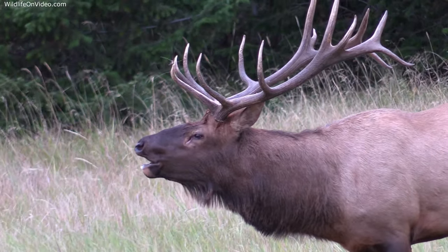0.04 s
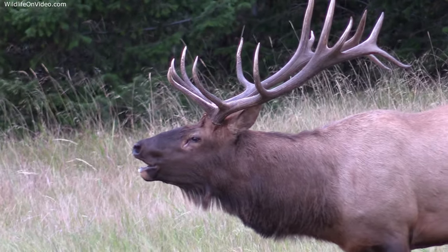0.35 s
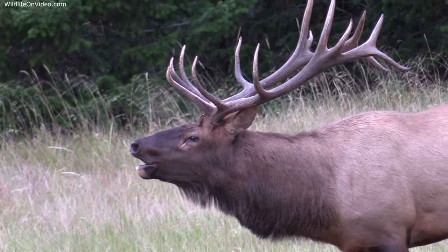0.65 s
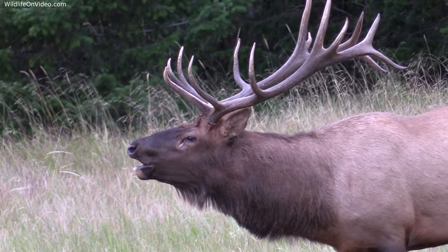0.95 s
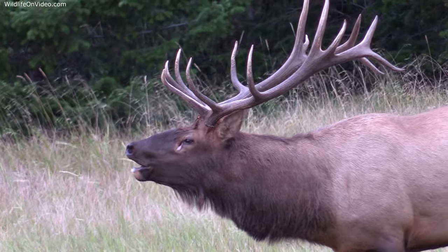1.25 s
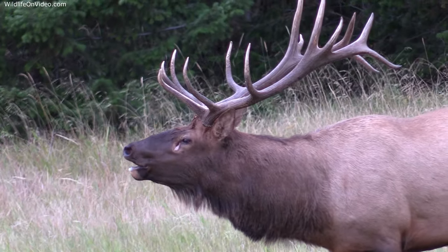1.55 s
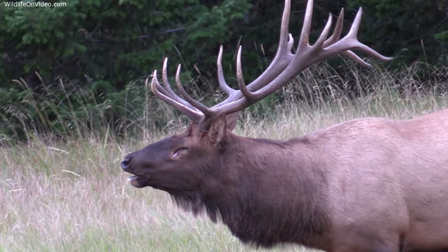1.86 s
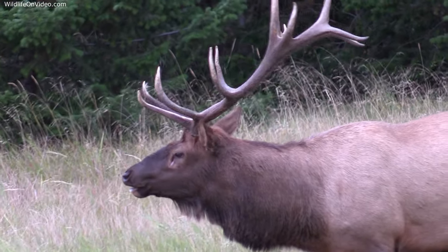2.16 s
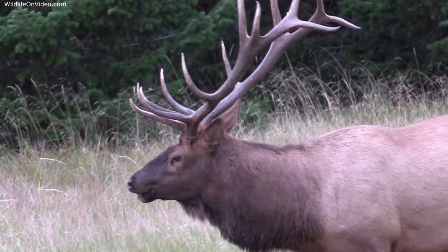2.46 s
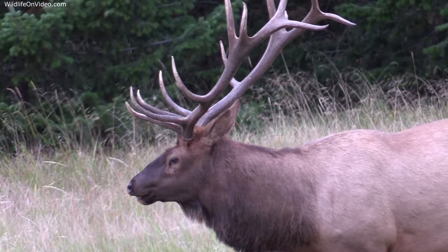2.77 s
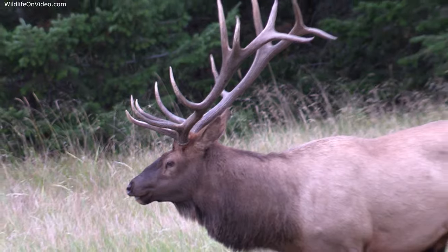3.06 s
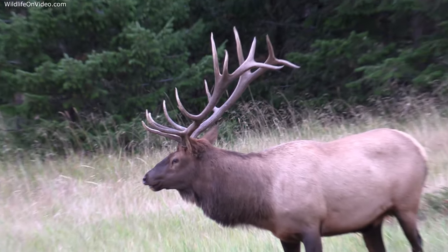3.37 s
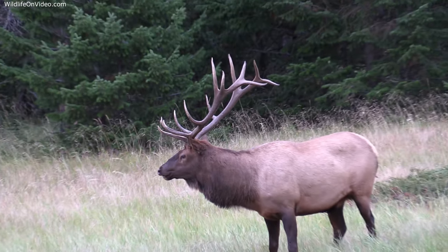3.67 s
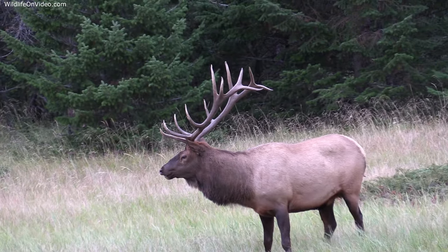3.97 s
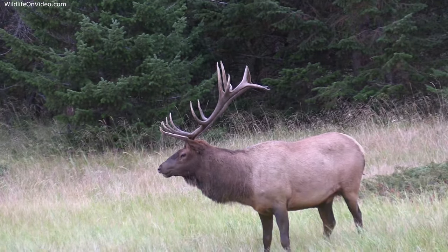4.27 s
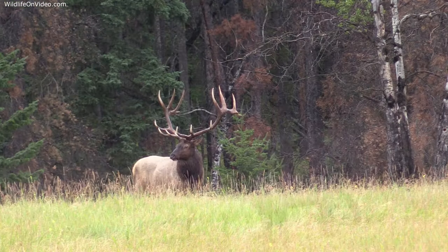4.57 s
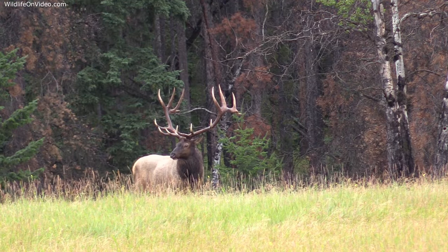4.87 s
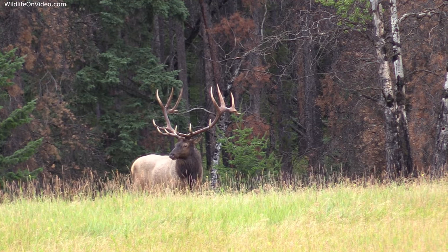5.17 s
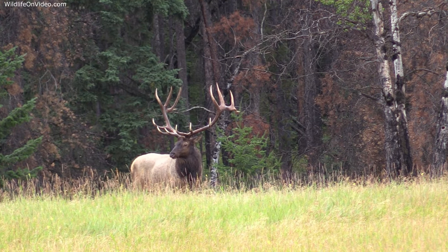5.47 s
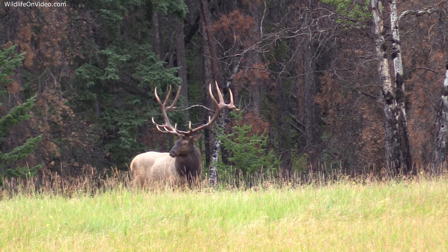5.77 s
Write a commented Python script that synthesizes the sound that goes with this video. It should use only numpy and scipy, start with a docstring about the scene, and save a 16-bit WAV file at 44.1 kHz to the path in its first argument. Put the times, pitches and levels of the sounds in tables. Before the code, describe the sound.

Outdoors at a forest edge, a fairly close bull elk chuckles, alternating honking breaths in with short, falling yelps. Thin whistles lead into the first two, and the fourth is a lower grunt. A faint echo dies away among the trees, leaving only the soft hush of the meadow. Toward the end, that hush blends into a louder, steady rush of faraway traffic.

```python
"""An elk chuckles by a forest

A bull elk calls in a meadow. Each push of air is a yelp that plunges through the resonances of his
long throat, the first two led in by a thin whistle. Before each yelp he sucks in air with a honk.
The trees echo faintly. Then the quiet meadow fades into a louder, duller rush of distant traffic."""
import sys
import numpy as np
from scipy import signal
from scipy.fft import rfft, irfft
from scipy.io import wavfile

SR = 44100
rng = np.random.default_rng(int(sys.argv[2]) if len(sys.argv) > 2 else 0)


def put_to_file(sound):
    """Save the sound as 16-bit audio at rate SR, in the file named by the first command-line argument."""
    columns = np.atleast_2d(sound).T  # one column per channel
    safe = np.clip(columns, -1, 1)
    whole_steps = np.round(safe * 32767)
    wavfile.write(sys.argv[1], SR, whole_steps.astype(np.int16))


N = 256662
TIME = np.arange(N) / SR

# The quiet air of the meadow: frequency_hz, level_db
MEADOW_SPECTRUM = [(15, -44), (25, -17.5), (144, -2.5), (178, -5.5), (281, -6), (305, -6.5), (331, -6),
                   (433, -6), (648, -6.5), (702, -7), (871, -10), (1950, -17.5), (3080, -24.5),
                   (8340, -32.5), (15500, -42.5)]
# How the meadow's low rumble rises and falls: time_s, level_db
MEADOW_RUMBLE = [(0, -3.5), (.7, -6), (1.3, 0), (2.5, 0.5), (4.3, -0.5)]
# Breaths in, each a moan that flips to a honk:
# flip_s, moan_length_s, first_pitch_hz, last_pitch_hz, honk_pitch_hz, moan_db, honk_db, air_db
PULLS = [(.007, 0.16, 403, 537, 1067, -19, -39, -29.5), (0.481, 0.13, 390, 555, 1045, -23.5, -26, -31),
         (1.003, .17, 363.6, 533.8, 673, -29, -24.5, -33.5), (1.471, 0.18, 320, 333.8, 145, -40, -20, -40)]
# Air rushing in: frequency_hz, level_db
IN_AIR_SPECTRUM = [(60, -23), (200, -15), (310, 1.5), (600, 12.5), (1000, 11.5), (1500, -5), (2300, -11.5),
                   (3500, -16.5), (7000, -25), (15000, -33)]
# Pitches at which the throat rings: frequency_hz, width_hz, level_db
THROAT_RESONANCES = [(168, 79, -8.5), (330.4, 87, 3.5), (420, 130, -6), (533.7, 42, 3), (679.7, 43, -3),
                     (858, 44, -2.5), (980, 76, -0.5), (1077, 151, 0), (1352, 107, -3), (1588, 43, 3),
                     (1865, 40, 5), (2100, 31, 4), (2310, 260, -0.5), (2880, 150, 1.5), (3870, 280, -6.5),
                     (4820, 99, -1.5), (5500, 500, -10)]
# Pitches that the nose and other side cavities swallow: frequency_hz, width_hz
CAVITY_NOTCHES = [(222, 91), (490, 12), (1180, 150), (1510, 45), (1700, 61), (1990, 170), (2960, 160)]
# Whistles: start_s, length_s, swell_db, swell_width_s, shrill_db
WHISTLES = [(0.101, 0.12, -27, 0.019, -30), (0.577, 0.11, -43.5, 0.035, -28.5)]
# The whistle's overtones, at 2 to 5 times its pitch: level_db
OVERTONES_DB = [0, -4.5, -22, -33]
# Breaths out: start_s, plunge_s, top_pitch_hz, bottom_pitch_hz, peak_after_s, width_s, tone_db, air_db
YELPS = [(.2, 0.037, 2154, 345.6, 0.041, 0.03, -11.5, -27), (.675, .04, 1983, 327.3, 0.03, 0.041, -13, -26),
         (1.113, .034, 1208, 238, 0.029, 0.019, -14, -40), (1.58, 0.03, 832.4, 273, 0.016, .014, -11, -47)]
# Air rushing out: frequency_hz, level_db
OUT_AIR_SPECTRUM = [(60, -16), (160, 7), (250, -2), (600, 5), (1200, 5), (2300, -11), (3200, -15),
                    (6000, -10.5), (9000, -27), (15000, -59)]
# Distant traffic: frequency_hz, level_db
TRAFFIC_SPECTRUM = [(18, -44), (30, -15), (75, -3), (152, 0.5), (182, -6), (263, -5), (420, -7.5),
                    (767, -0.5), (1230, -7.5), (1820, -11.5), (2910, -21.5), (4780, -26), (6530, -33.5),
                    (8490, -43), (15500, -49.5)]


def undb(db):
    """Turn decibels into a number to multiply by."""
    return 10 ** (np.asarray(db) / 20)


def unit(x):
    """Scale a signal to an average strength (rms) of 1."""
    return x / np.sqrt(np.mean(x ** 2))


def bump(t, width):
    """A smooth hill that reaches 1 at t = 0."""
    return np.exp(-(t / width) ** 2)


def gate(t, attack_s, length_s, release_s):
    """Rise from t = 0, hold until length_s, then die away."""
    return np.clip(t / attack_s, 0, 1) * np.exp(-np.maximum(t - length_s, 0) / release_s)


def colour(x, spectrum):
    """Shape the bass and treble along (frequency_hz, level_db) points."""
    hz, db = np.transpose(spectrum)
    bins = np.maximum(np.fft.rfftfreq(N, 1 / SR), 1)
    return irfft(rfft(x) * undb(np.interp(np.log(bins), np.log(hz), db)), N)


def wander(rate_hz):
    """A smooth random wobble of strength 1 that changes about rate_hz times a second."""
    bins = np.fft.rfftfreq(N, 1 / SR)
    return unit(irfft(rfft(rng.standard_normal(N)) * np.exp(-(bins / rate_hz) ** 2), N))


def far_noise(spectrum, flicker_db, bass_db, treble_db=0):
    """A steady, faraway rush in bands an octave wide; the low bands flicker most."""
    noise = rfft(unit(colour(rng.standard_normal(N), spectrum)))
    octave = np.log2(np.clip(np.fft.rfftfreq(N, 1 / SR), 32, 16384))
    out = 0
    for k in range(5, 15):
        band = irfft(noise * np.maximum(1 - abs(octave - k), 0), N)
        lowness = min(1, 2 ** (8 - k))
        highness = min(1, 2 ** (k - 12))
        flicker = flicker_db * wander(9.7) * np.sqrt(lowness)
        out = out + band * undb(flicker + bass_db * lowness + treble_db * highness)
    return out


def meadow(settle_db_per_s=0.38):
    """Quiet open air over a low rumble, slowly getting softer."""
    rumble_db = np.interp(TIME, *np.transpose(MEADOW_RUMBLE))
    air = far_noise(MEADOW_SPECTRUM, flicker_db=1.0, bass_db=rumble_db)
    return undb(-44.8 - settle_db_per_s * TIME) * air


def pull(flip_s, length_s, first_hz, last_hz, honk_hz, moan_db, honk_db, air_db):
    """Pitch, tone strength and air strength of a breath in: a growing moan flips to a honk and stops."""
    t = TIME - flip_s
    progress = np.clip(1 + t / length_s, 0, 1)
    moan_hz = first_hz + (last_hz - first_hz) * progress
    flipped = (1 + np.tanh(t / 0.0048)) / 2
    hz = moan_hz + (honk_hz - moan_hz) * flipped
    moan = undb(moan_db) * progress ** 0.89
    honk = undb(honk_db) * bump(t - 0.0037, 0.0087)
    surge = undb(-3) * bump(t + 0.014, 0.01)  # extra air just before the flip
    air = undb(air_db) * (progress ** 0.48 + surge)
    stop = np.exp(-np.maximum(t - 0.0078, 0) / 0.011)
    return hz, stop * (moan + honk), stop * air


def voice(call, air, fold_hz, fold_db, growl, jitter, rough):
    """Heavy vocal folds shake a gliding tone and rushing air, and add a low note of their own."""
    hz, tone_gain, air_gain = call
    phase = 2 * np.pi * np.cumsum(hz * (1 + jitter * wander(222))) / SR
    folds = np.sin(2 * np.pi * np.cumsum(fold_hz * (1 + 0.027 * wander(55))) / SR)
    # at the lowest pitches the tone turns into a buzzing grunt
    buzz = undb(-4) * bump(hz, 250) * np.sin(3 * phase)
    tone = (np.sin(phase) + undb(-22.5) * np.sin(2 * phase) + buzz) * (1 + rough * wander(244))
    # a slack, low-pitched throat makes a duller rush
    dull = colour(air, [(2200, 2.0), (3500, -6)])
    rush = dull + np.clip(hz / 1100, 0, 1) * (air - dull)
    shaken = (np.sqrt(2) * tone_gain * tone + air_gain * rush) * (1 + growl * folds)
    # the folds' note comes out more once the air flows strongly
    drive = (1.61 + np.tanh(3 * (air_gain / undb(-31) - 1))) / 2
    return shaken + undb(fold_db) * air_gain * drive * folds


def throat(x, leak_db):
    """A long tube that rings on after the pitch slides past each resonance; some sound leaks by."""
    x = x + 1e-18  # a tiny offset keeps the filters fast during silence
    out = undb(leak_db) * x
    for k, (hz, width_hz, db) in enumerate(THROAT_RESONANCES):
        ring = signal.lfilter(*signal.iirpeak(hz, hz / width_hz, fs=SR), x)
        out = out + (-1) ** k * undb(db) * ring  # neighbours swing opposite ways
    for hz, width_hz in CAVITY_NOTCHES:
        out = signal.lfilter(*signal.iirnotch(hz, hz / width_hz, fs=SR), out)
    # the mouth is too small to send out deep bass
    return signal.sosfilt(signal.butter(2, 95, "high", fs=SR, output="sos"), out)


def chuckle(calls, air_spectrum, leak_db, **voice_settings):
    """A series of breaths passes the vocal folds and rings the throat."""
    air = colour(rng.standard_normal(N), air_spectrum)
    air = air / np.std(throat(air, leak_db))
    source = sum(voice(call, air, **voice_settings) for call in calls)
    return throat(source, leak_db)


def whistle(start_s, length_s, swell_db, swell_width_s, shrill_db):
    """A thin tone rings the throat and turns shrill as the push grows; a faint second whistle joins."""
    pitch_hz, second_hz = 1824.3, 2725
    scoop_hz, creep_hz_per_s, sag_hz = 225.4, 263, 180
    t = TIME - start_s
    age = np.clip(t, 0, length_s)
    on = gate(t, 0.004, length_s, release_s=0.01)
    # the pitch scoops up, creeps higher and sags as it breaks off
    scoop = bump(age, 0.029)
    sag = 1 - bump(np.maximum(t - length_s, 0), 0.015)
    hz = pitch_hz + creep_hz_per_s * age - scoop_hz * scoop - sag_hz * sag
    wobble = (0.0013 + 0.0081 * scoop) * wander(84) + 0.0038 * wander(1000)
    phase = 2 * np.pi * np.cumsum(hz * (1 + wobble)) / SR
    flutter = 1 + (0.17 + 0.26 * scoop) * wander(390)  # hoarsest at the start
    # the pure tone swells first, the overtones and the hiss just before the end
    pure = (undb(-32.5) + undb(swell_db) * bump(t - 0.067, swell_width_s)) * np.sin(phase)
    push = bump(t - length_s + 0.012, 0.026)
    overtones = sum(undb(db) * np.sin(k * phase) for k, db in enumerate(OVERTONES_DB, 2))
    shrill = (undb(-51) + undb(shrill_db) * push) * overtones
    second_swell = np.sin(np.pi * (age / length_s) ** 0.73)
    second_phase = 2 * np.pi * np.cumsum(second_hz * (1 + 0.01 * wander(180))) / SR
    # both whistles share one air stream, so a hard push mixes them into extra tones
    mixing = 1 + 2 * undb(-12) * push * (np.sin(phase) + np.sin(2 * phase))
    second = undb(-48) * second_swell * np.sin(second_phase) * mixing
    air = undb(shrill_db) * bump(t - length_s + 0.013, 0.056) * hiss()
    rung = throat(on * flutter * pure, leak_db=-27)
    return np.sqrt(2) * (rung + on * (flutter * shrill + second)) + on * air


def hiss():
    """Air tears past the whistling edge."""
    spectrum = [(1500, -26), (2300, -5), (3000, 3.5), (3600, -20), (4300, 4), (5400, 7),
                (6800, -7.5), (8200, -1), (10500, -37), (15000, -31)]
    return undb(-19) * unit(colour(rng.standard_normal(N), spectrum))


def yelp(start_s, plunge_s, top_hz, bottom_hz, peak_after_s, width_s, tone_db, air_db):
    """Pitch, tone strength and air strength of a breath out: the pitch dives as the throat slackens."""
    attack_s = 0.0051
    t = TIME - start_s
    hz = bottom_hz + (top_hz - bottom_hz) * bump(np.maximum(t, 0), plunge_s)
    tone = gate(t, attack_s, 1.78 * plunge_s, release_s=0.0087) * bump(t - peak_after_s, width_s)
    leak = undb(-11.5) * bump(t, 0.071) * (t < attack_s)  # a little air escapes ahead of the yelp
    rush = gate(t, attack_s, 1.37 * plunge_s, release_s=0.016)
    return hz, undb(tone_db) * tone, undb(air_db) * np.maximum(leak, rush)


def forest(x, decay_s=2.0, build_s=0.18, echo_delay_s=0.18):
    """Trunks scatter the sound into a long, faint tail; the forest's edge returns one blurred echo."""
    t = TIME[:2 * SR]
    tail = unit(rng.standard_normal(len(t))) * 1000 ** (-t / decay_s) * (1 - np.exp(-t / build_s))
    edge = rng.standard_normal(len(t)) * bump(t - echo_delay_s, 0.031)
    response = undb(-30) * tail / np.linalg.norm(tail) + undb(-31) * edge / np.linalg.norm(edge)
    spectrum = [(150, -2), (400, 9), (650, 4), (1150, 9), (1900, 7.5), (3700, 0.5), (9000, -7)]
    return colour(signal.fftconvolve(x, response)[:N], spectrum)


def traffic(start_s, brighten_db_per_s=2.5):
    """The dull rush of distant traffic, slowly growing brighter."""
    treble_db = -3.1 + brighten_db_per_s * (TIME - start_s)
    return undb(-38.3) * far_noise(TRAFFIC_SPECTRUM, flicker_db=0.8, bass_db=1.0, treble_db=treble_db)


def scene(fade_start_s=4.27, fade_length_s=0.4):
    """The elk and his echo over the meadow, which then gives way to traffic."""
    whistles = sum(whistle(*row) for row in WHISTLES)
    yelps = chuckle([yelp(*row) for row in YELPS], OUT_AIR_SPECTRUM, leak_db=-13,
                    fold_hz=169.9, fold_db=-11.5, growl=0.33, jitter=0.0254, rough=0.24)
    pulls = chuckle([pull(*row) for row in PULLS], IN_AIR_SPECTRUM, leak_db=-11.5,
                    fold_hz=306.7, fold_db=0.0, growl=0.2, jitter=0.039, rough=0.11)
    elk = pulls + whistles + yelps
    fade = np.clip((TIME - fade_start_s) / fade_length_s, 0, 1)
    background = (1 - fade) * meadow() + fade * traffic(fade_start_s)
    return (elk + forest(elk) + background)[None]


def record(dry, top_hz=15700):
    """Cut away the very highest treble."""
    return signal.sosfilt(signal.ellip(12, 0.1, 80, top_hz, fs=SR, output="sos"), dry)


dry = scene()
out = record(dry)
put_to_file(out)
```